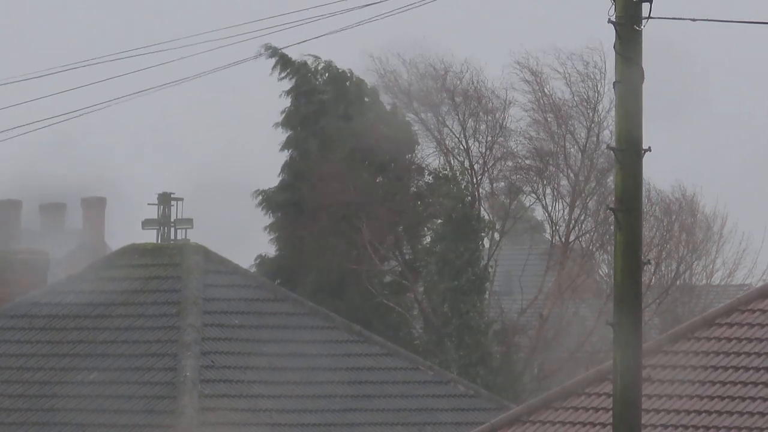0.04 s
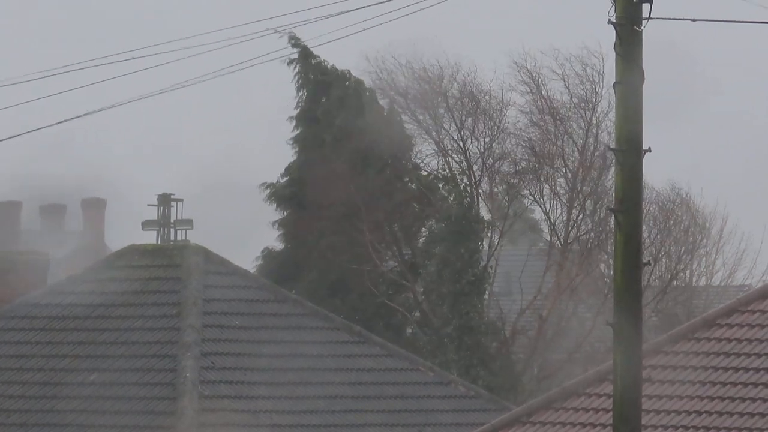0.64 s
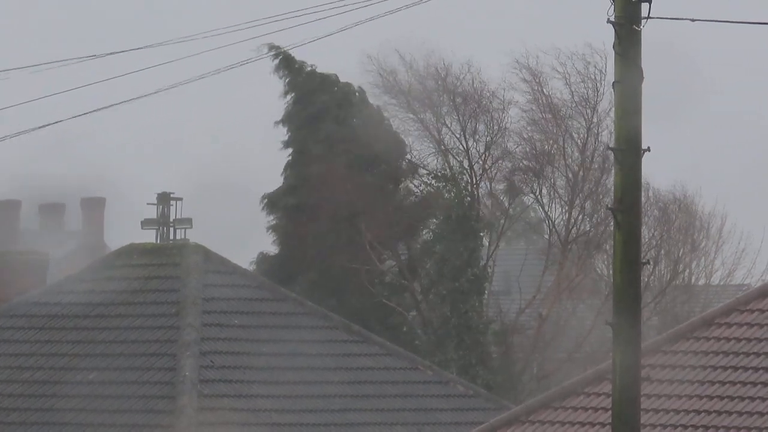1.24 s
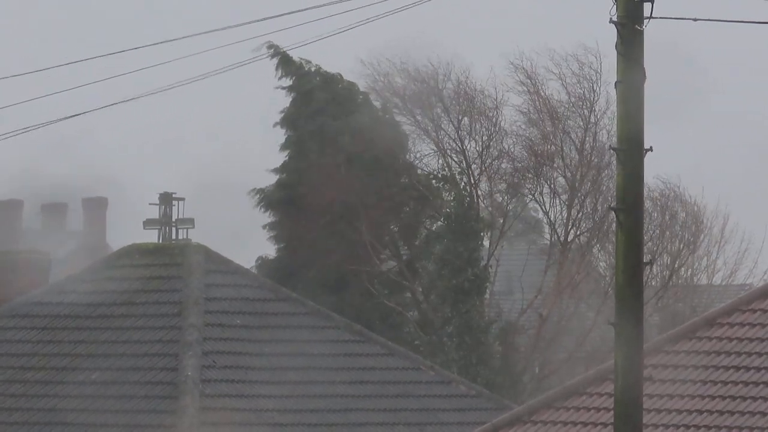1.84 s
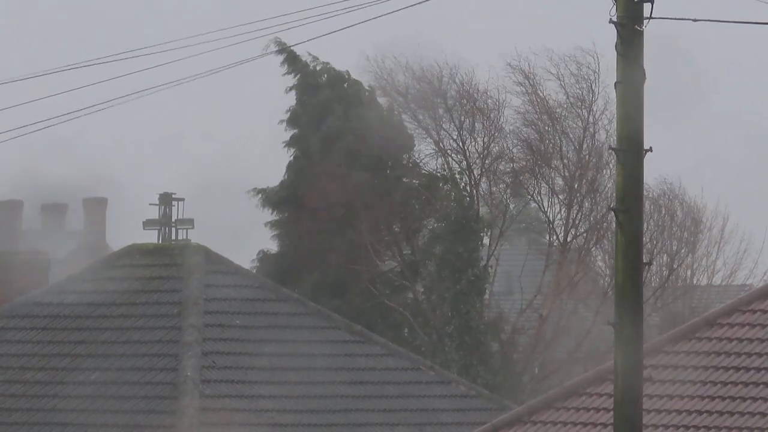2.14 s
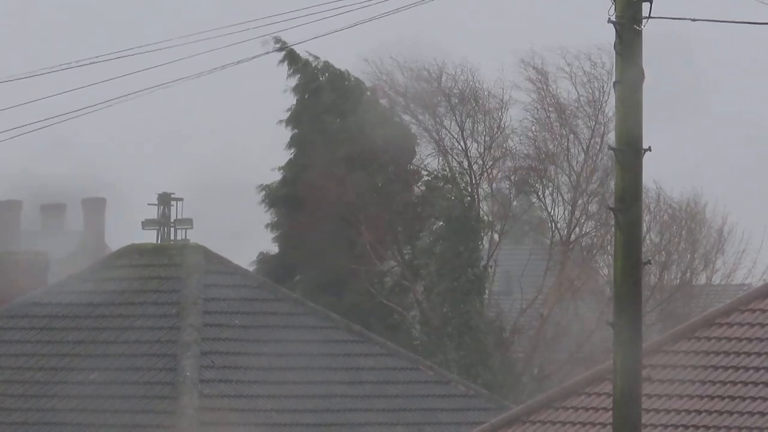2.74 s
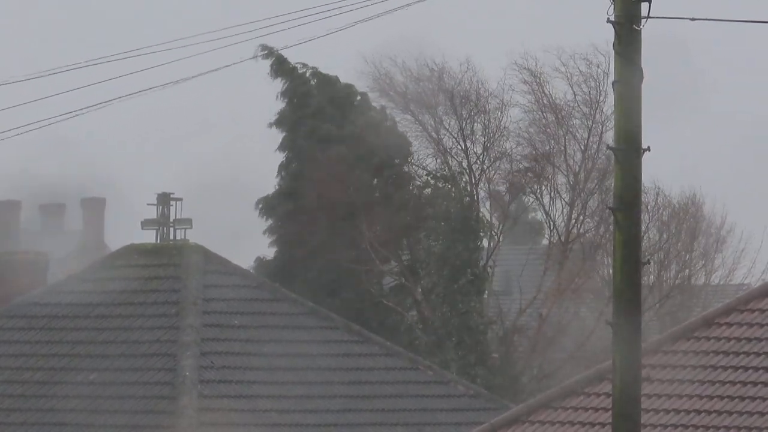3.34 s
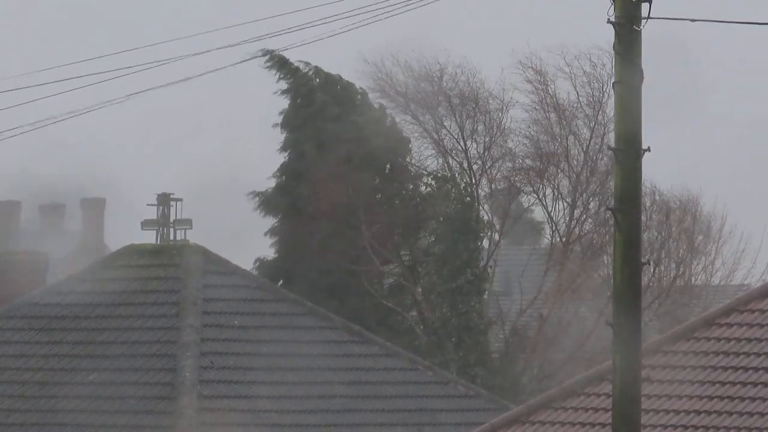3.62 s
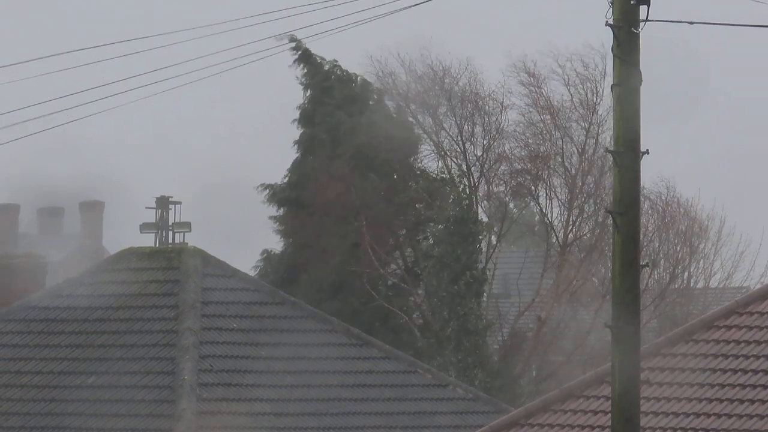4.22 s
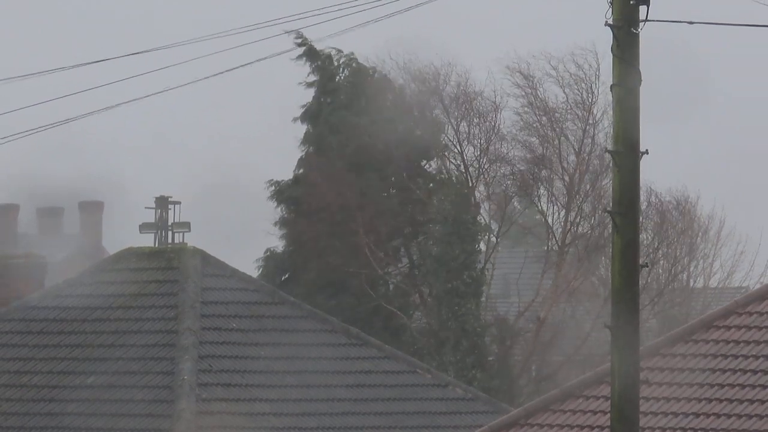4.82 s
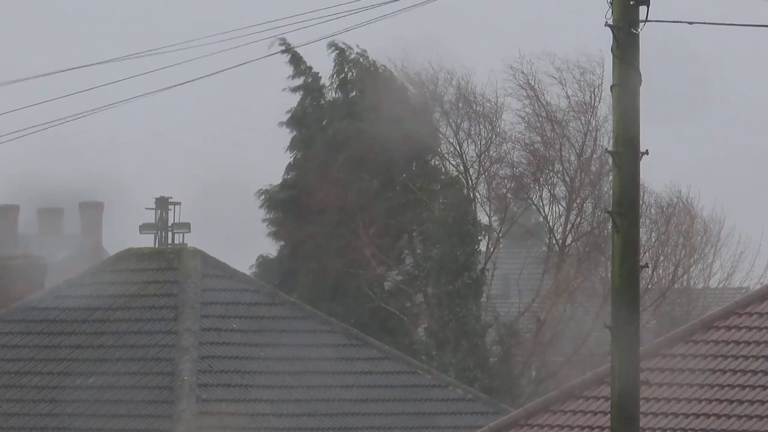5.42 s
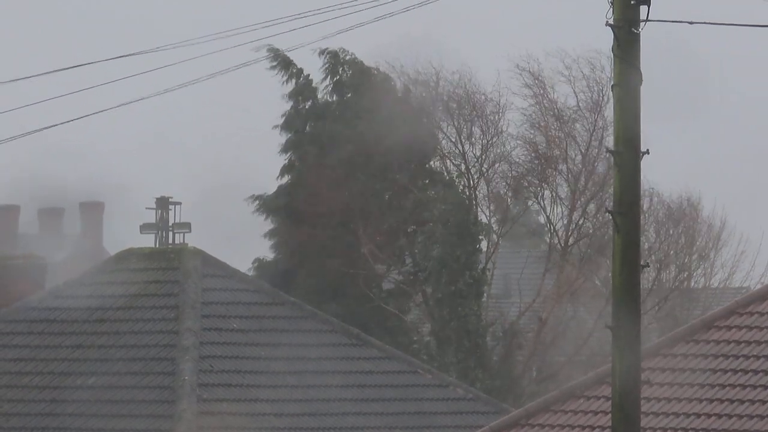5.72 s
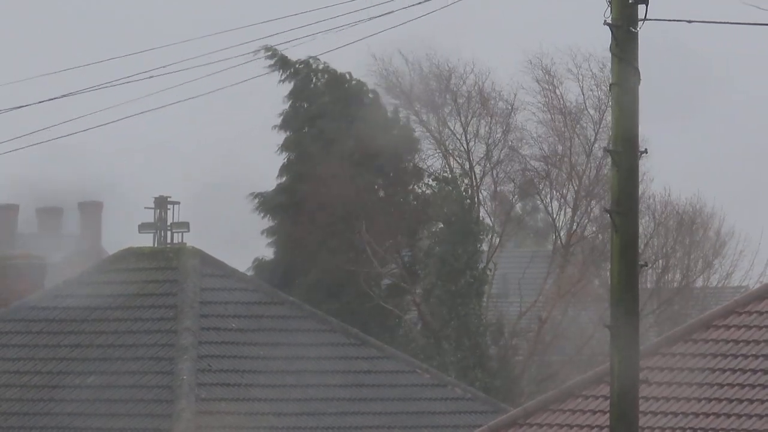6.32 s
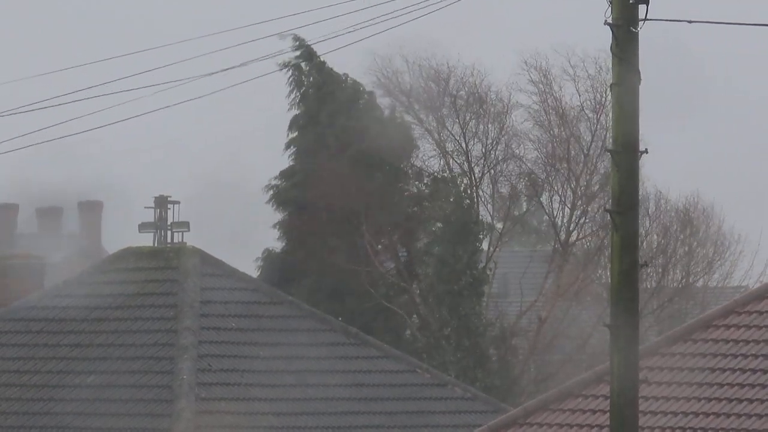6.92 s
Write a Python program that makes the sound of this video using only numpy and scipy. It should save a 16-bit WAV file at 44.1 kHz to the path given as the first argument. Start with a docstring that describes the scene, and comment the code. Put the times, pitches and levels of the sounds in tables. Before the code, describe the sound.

Muffled wind rumbles against a house while a draught whistles through the window frame over a soft hiss of rain.

```python
"""Behind a closed window, facing rooftops and trees in a wet gale.
Fluctuating wind pressure makes the house rumble and drives the pane and the room at their resonances;
the draught excites a hollow, wavering note in the gaps of the frame. Straight ahead, turbulence roars
over the roofs, the trees rush, fine rain hisses with the gusts and one bigger drop ticks on the glass.
A wide, steady hiss lies under it all."""
import sys
import numpy as np
from scipy import signal
from scipy.io import wavfile
from scipy.ndimage import uniform_filter1d

SR = 44100
rng = np.random.default_rng(int(sys.argv[2]) if len(sys.argv) > 2 else 0)


def to_wav(sig):
    """Store sig (one row per channel, or 1-D mono) as 16-bit WAV at the path in sys.argv[1].

    Samples outside -1..1 are clipped; the rate is SR.
    """
    pcm = np.clip(np.atleast_2d(sig), -1, 1) * 32767
    pcm = np.round(pcm).astype(np.int16)
    wavfile.write(sys.argv[1], SR, pcm.T)  # frames by channels


N = 311346

# Wind pressure on the house, easing halfway through. Each row: time in seconds, level in dB.
BUFFET = [(0.0, -39.5), (1.45, -39.5), (2.05, -39), (2.62, -41), (2.9, -40), (4.0, -42), (5.8, -42),
          (7.06, -41.5)]
# The room's drone, strongest in the first half. Each row: time in seconds, level in dB.
DRONE_LEVEL = [(0.0, -69), (0.4, -50.5), (1.7, -52), (1.9, -47), (2.15, -46.5), (2.6, -53), (3.5, -52.5),
               (4.1, -55.5), (4.6, -53), (5.2, -58), (5.8, -54), (6.4, -58), (7.06, -50)]
# The draught's note and the frame's weaker resonances. Each row: time in seconds, level in dB.
DRAUGHT_LEVEL = [(0.0, -56.5), (0.75, -57), (1.1, -54.5), (1.65, -57.5), (1.92, -54), (2.2, -59),
                 (2.55, -57), (3.0, -55), (3.9, -56), (4.9, -53.5), (5.6, -55), (6.05, -57), (7.06, -55.5)]
FRAME_LEVEL = [(0.0, -64), (0.3, -58.5), (0.7, -61), (1.15, -58), (1.8, -58.5), (2.75, -56.5), (3.45, -59),
               (4.25, -57.5), (4.6, -60), (4.98, -54), (5.4, -58.5), (6.1, -56), (7.06, -60)]
# Wind over the near roofs and in the far trees. Each row: time in seconds, level in dB.
ROOF_WIND = [(0.0, -51), (1.0, -53.5), (2.6, -56), (3.8, -55), (4.3, -54.5), (5.2, -57), (5.8, -53),
             (7.06, -56)]
TREE_WIND = [(0.0, -59.5), (0.27, -54.5), (0.43, -58.5), (0.62, -54), (0.88, -56.5), (1.02, -62),
             (1.3, -56), (1.6, -61), (2.4, -61.5), (2.88, -58.5), (3.3, -63), (3.75, -62.5), (4.05, -58),
             (4.3, -61), (4.82, -57.5), (5.17, -63.5), (5.36, -55), (5.68, -55), (5.85, -58.5),
             (6.55, -56.5), (7.0, -60.5)]
# Gusts that drive the rain and bend the note. Each row: time in seconds, relative strength in dB.
GUSTS = [(0.0, 1), (0.2, 2), (0.45, 2), (0.67, 3.5), (0.88, 3), (1.03, -0.1), (1.22, 1.2), (1.4, 0),
         (1.55, -3), (2.48, -4.5), (2.85, 0.7), (3.1, -2), (3.38, -4.5), (3.62, 1.4), (3.95, -4),
         (4.28, -1.3), (4.44, 1.7), (4.65, -1.6), (4.9, 0.1), (5.2, -1), (5.4, 0.1), (5.72, 3), (5.95, 1.3),
         (6.2, 0.3), (6.42, 1.5), (6.63, 1.37), (6.85, -1), (7.06, 2)]

# Puffs of air that lift the pane's boom, the drone, the draught's note and the thin high note.
# Each row: time of the peak in seconds, length in seconds, rise in dB.
PANE_SHOVES = [(0.55, 0.4, 3.5), (2.803, 0.18, 8.5), (3.56, 0.34, 8), (4.156, 0.4, 13), (5.04, 0.27, 2.5),
               (5.84, 0.22, 9), (6.44, 0.35, 5), (6.857, 0.4, 11)]
DRONE_SWELLS = [(0.358, 0.084, 7), (0.755, 0.15, 7), (2.348, 0.14, 7), (3.047, 0.11, 10.5),
                (3.375, 0.17, 7), (3.726, 0.16, 8), (4.724, 0.16, 10), (5.841, 0.13, 10), (6.74, 0.18, 9)]
WHISTLE_FLARES = [(0.085, 0.045, 13), (0.274, 0.1, 4), (0.603, 0.082, 7.5), (1.119, 0.063, 6),
                  (1.215, 0.07, 7), (1.455, 0.068, 7.5), (1.586, 0.065, 6), (1.649, 0.046, 9.5),
                  (1.771, 0.04, 10), (2.73, 0.039, 8), (2.988, 0.072, 8), (3.095, 0.065, 6),
                  (3.21, 0.11, 4.5), (3.473, 0.066, 7.5), (3.696, 0.064, 6.5), (3.926, 0.05, 4),
                  (4.102, 0.049, 7), (4.24, 0.14, 2), (4.541, 0.071, 4), (4.688, 0.033, 6.5),
                  (4.936, 0.077, 4), (5.501, 0.063, 4), (5.72, 0.12, 8.5), (6.707, 0.046, 7),
                  (6.824, 0.06, 9)]
THIN_SWELLS = [(0.66, 0.55, 6.5), (1.22, 0.4, 6.5), (2.82, 0.91, 6.5), (5.66, 0.7, 7)]

# Resonances of the pane and the room. Each row: frequency in Hz, width in Hz, relative level in dB.
PANE_MODES = [(62.64, 4.4, 0)]
ROOM_MODES = [(114.9, 8.9, 1.5), (175.3, 12.6, -3.5)]
DRONE_MODES = [(153.6, 9.5, 0)]
# Resonances of the frame's gaps: the main note, the weaker tones, the thin note, the rain's colouring.
# Each row: frequency in Hz, width in Hz, relative level in dB.
WHISTLE_MODES = [(841, 8, 0), (850.5, 15, -0.3), (862, 32, -2.5)]
FRAME_MODES = [(741, 10, -3), (775, 26, -2), (822, 20, -2.5), (926, 28, 0), (1030, 45, -4.5),
               (1218, 25, -11)]
THIN_MODES = [(3140, 40, -2.5), (3235, 60, 0), (3310, 110, -4)]
RAIN_GAP_MODES = [(2857, 45, 1.5), (2980, 150, 3.5), (3190, 160, 0), (3560, 250, -3), (4240, 260, 0)]
# Hollow tones of the eaves. Each row: frequency in Hz, width in Hz, relative level in dB.
EAVES_MODES = [(326, 22.3, 2), (559.5, 42, 1)]

# Spectra of the broadband sources. Each row: frequency in Hz, relative spectral density in dB.
RUMBLE_SPECTRUM = [(12, 0), (22, -3.5), (38, 4), (52, -3), (80, 0.5), (120, 0.5), (160, -5.5), (205, -6),
                   (260, -25), (400, -28)]
ROAR_SPECTRUM = [(180, 0), (300, -5.5), (430, 0.7), (550, -7), (660, -3), (900, -11), (1300, -26)]
TREE_SPECTRUM = [(600, -7.5), (1000, 1.5), (1400, -2.5), (1800, -5), (2200, -11), (5000, -22)]
RAIN_SPECTRUM = [(1200, -9), (2000, -1.5), (3000, -0.5), (4200, -5), (5500, -11), (8000, -27), (14000, -39)]
HISS_SPECTRUM = [(50, -31), (100, 0), (160, -1.5), (240, 1), (440, -0.5), (530, -5.5), (900, -7.5),
                 (2000, -13), (4000, -18.5), (7000, -24), (10000, -30), (12000, -34), (13600, -30),
                 (15500, -49)]
# Likeness of left and right. Each row: frequency in Hz, correlation coefficient.
RUMBLE_CORRELATION = [(40, .9995), (200, .99)]
OUTDOOR_CORRELATION = [(200, 0.83), (8000, 0.9)]
HISS_CORRELATION = [(450, 0), (2000, 0.087), (4000, 0.26), (8000, 0.47), (14000, 0.32)]

# A drop on the window. Each row: start in seconds, peak level in dB, ringing frequency in Hz.
DROPS = [(5.9145, -40.5, 2190)]


def house(rumble_db=-2.0, room_db=-15.0):
    """Forced vibration: wind pressure shakes the house and excites the room's modes in proportion."""
    buffet = in_time(BUFFET)
    rumble = air_noise(RUMBLE_SPECTRUM, RUMBLE_CORRELATION, flutter_db=0.5, flutter_rate=2.8)
    rumble = sustained(rumble, memory_s=0.18)
    room = sustained(blown(ROOM_MODES), memory_s=0.31)
    return from_db(buffet + rumble_db) * rumble + from_db(buffet + room_db) * room


def pane_boom(base_db=-48.5, db_per_buffet_db=3.6):
    """Plate resonance: the pane booms in one low mode, harder with each shove of air."""
    buffet = in_time(BUFFET)
    swing_db = base_db + db_per_buffet_db * (buffet - buffet.mean()) + swells(PANE_SHOVES)
    return from_db(swing_db) * sustained(blown(PANE_MODES), memory_s=0.26)


def room_drone():
    """Standing wave: one mode of the room wells up and recedes."""
    level_db = in_time(DRONE_LEVEL) + swells(DRONE_SWELLS)
    return from_db(level_db) * sustained(blown(DRONE_MODES), memory_s=0.052)


def draught_whistle(gain_db=-0.3, right_db=1.5, pitch_per_gust_db=0.0012, pitch_waver=0.00399):
    """Flow-excited resonance: the draught sings in the frame, its pitch rising slightly in gusts."""
    level_db = in_time(DRAUGHT_LEVEL) + swells(WHISTLE_FLARES) + gain_db
    speed = 1 + pitch_per_gust_db * in_time(GUSTS) + pitch_waver * drift(5.54)
    note = bent(blown(WHISTLE_MODES, correlation=0.99), speed)
    pan = from_db([[-right_db / 2], [right_db / 2]])
    return from_db(level_db) * sustained(note, memory_s=0.079) * pan


def frame_tones(thin_db=-76.5):
    """Secondary resonances of the gaps: hollow tones and a thin high note swell independently."""
    thin = from_db(thin_db + swells(THIN_SWELLS))
    return from_db(in_time(FRAME_LEVEL)) * blown(FRAME_MODES) + thin * blown(THIN_MODES)


def roof_roar(eaves_db=-5.5):
    """Turbulence: eddies over the roofs radiate broad noise and excite the resonances of the eaves."""
    roar = air_noise(ROAR_SPECTRUM, OUTDOOR_CORRELATION, flutter_db=2.5, flutter_rate=9.0)
    eaves = from_db(eaves_db) * blown(EAVES_MODES, correlation=0.75)
    return from_db(in_time(ROOF_WIND)) * (roar + eaves)


def tree_rush():
    """Incoherent summation: countless far twigs in the wind merge into one rush."""
    rush = air_noise(TREE_SPECTRUM, OUTDOOR_CORRELATION, flutter_db=2.4, flutter_rate=10.0)
    return from_db(in_time(TREE_WIND)) * rush


def fine_rain(level_db=-63.0, gaps_db=-6.0, rain_per_gust_db=0.92, gaps_per_gust_db=1.8):
    """Dense random impacts merge into a hiss that follows the gusts, coloured by the gaps' resonances."""
    gust_db = in_time(GUSTS)
    sheets = air_noise(RAIN_SPECTRUM, OUTDOOR_CORRELATION, flutter_db=2.5, flutter_rate=20.0)
    through_gaps = from_db(gaps_db + gaps_per_gust_db * gust_db) * blown(RAIN_GAP_MODES)
    return from_db(level_db) * (from_db(rain_per_gust_db * gust_db) * sheets + through_gaps)


def drop_tick(rise_s=0.00063):
    """Damped impact: a soft wet contact rings for a few cycles and dies within milliseconds."""
    out = np.zeros(N)
    for start, peak_db, hz in DROPS:
        age = np.maximum(np.arange(N) / SR - start, 0)
        envelope = age / rise_s * np.exp(1 - age / rise_s)
        out += from_db(peak_db) * envelope * np.sin(2 * np.pi * hz * age)
    return out


def steady_hiss(level_db=-51.0):
    """Diffuse noise: low correlation makes this even background wide; the gusts do not move it."""
    return from_db(level_db) * air_noise(HISS_SPECTRUM, HISS_CORRELATION, flutter_db=0.5, flutter_rate=9.3)


def air_noise(spectrum, correlations, flutter_db, flutter_rate):
    """Amplitude modulation: third-octave bands of stereo noise flutter, partly in step; rms 1."""
    edges = 12.5 * 2 ** (np.arange(32) / 3)
    white = rng.standard_normal((2, 2, N + SR // 2))
    out, together = 0, drift(flutter_rate)
    for k, (low, high) in enumerate(zip(edges, edges[1:])):
        if high < spectrum[0][0] or low > spectrum[-1][0]:
            continue
        hz = np.sqrt(low * high)
        band = signal.butter(2, [low, high], "band", fs=SR, output="sos")
        mid, side = signal.sosfilt(band, white[k % 2])[:, -N:]  # adjacent bands use unrelated noise
        flutter = flutter_db * (together + drift(flutter_rate)) / 2
        out += from_db(at_hz(spectrum, hz) + flutter) * stereo(mid, side, at_hz(correlations, hz))
    return rms_one(out)


def blown(modes, correlation=1.0):
    """Random excitation: noise keeps each resonance ringing with wandering amplitude and phase; rms 1."""
    out = 0
    for hz, width, db in modes:
        radius = np.exp(-np.pi * np.sqrt(2) * width / SR)
        resonator = [1 - radius, 0, radius - 1, 1, -2 * radius * np.cos(2 * np.pi * hz / SR), radius ** 2]
        turbulence = rng.standard_normal((2, N + SR // 2))
        mid, side = signal.sosfilt([resonator, resonator], turbulence)[:, -N:]
        out += from_db(db) * stereo(rms_one(mid), rms_one(side), correlation)
    return rms_one(out)


def sustained(x, memory_s):
    """Steady oscillation: division by the running rms evens out swells slower than the memory."""
    power = uniform_filter1d(np.mean(x ** 2, axis=0), max(int(memory_s * SR), 2))
    return x / np.sqrt(power + 1e-9)


def swells(rows):
    """Superposition: each puff of air adds one cosine arch to the level in dB."""
    t = np.arange(N) / SR
    return sum(rise_db * np.cos(np.pi * np.clip((t - peak_s) / length_s, -.5, .5))
               for peak_s, length_s, rise_db in rows)


def bent(x, speed):
    """Frequency modulation: reading a stereo sound at a changing speed bends its pitch."""
    position = np.cumsum(speed / speed.mean()) - 1
    return np.array([np.interp(position, np.arange(N), channel) for channel in x])


def drift(rate):
    """Low-passed noise: a random curve of rms 1 that changes about `rate` times a second."""
    hop, settle = 100, 1000  # samples per step; steps for the filter to settle
    pole = np.exp(-2 * np.pi * rate * hop / SR)
    white = rng.standard_normal(N // hop + settle + 2)
    slow = signal.lfilter([1], [1, -2 * pole, pole ** 2], white)[settle:]
    return np.interp(np.arange(N) / hop, np.arange(len(slow)), rms_one(slow))


def stereo(mid, side, correlation):
    """Sum and difference: two unrelated noises become a left and right with the given correlation."""
    correlation = np.clip(correlation, -1, 1)
    return np.sqrt(1 + correlation) * mid + np.sqrt(1 - correlation) * side * np.array([[1], [-1]])


def in_time(rows):
    """Linear interpolation of a curve at every sample."""
    seconds, values = np.transpose(rows)
    return np.interp(np.arange(N) / SR, seconds, values)


def at_hz(rows, hz):
    """Interpolation on a log-frequency axis."""
    frequencies, values = np.transpose(rows)
    return np.interp(np.log(hz), np.log(frequencies), values)


def from_db(db):
    """Decibels to amplitude ratio."""
    return 10 ** (np.asarray(db) / 20)


def rms_one(x):
    """Normalisation to rms 1."""
    return x / np.sqrt(np.mean(x ** 2) + 1e-20)


def scene():
    """Superposition: the pressures of all sources add behind the glass."""
    building = house() + pane_boom() + room_drone() + draught_whistle() + frame_tones()
    weather = roof_roar() + tree_rush() + fine_rain() + drop_tick()
    return building + weather + steady_hiss()


def record(dry, cutoff_hz=15400):
    """Band limiting: a steep elliptic low-pass removes the highest treble."""
    return signal.sosfilt(signal.ellip(12, .1, 90, cutoff_hz, fs=SR, output="sos"), dry)


dry = scene()
out = record(dry)
to_wav(out)
```